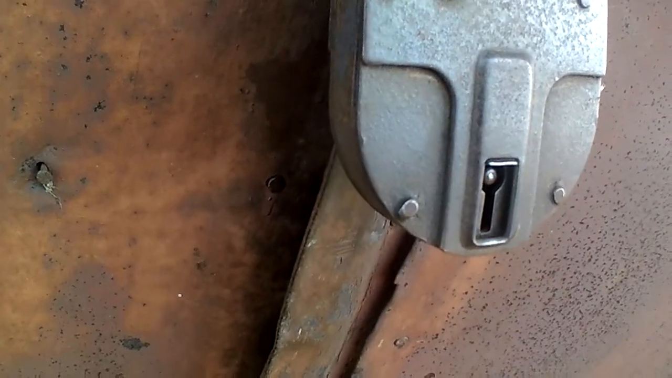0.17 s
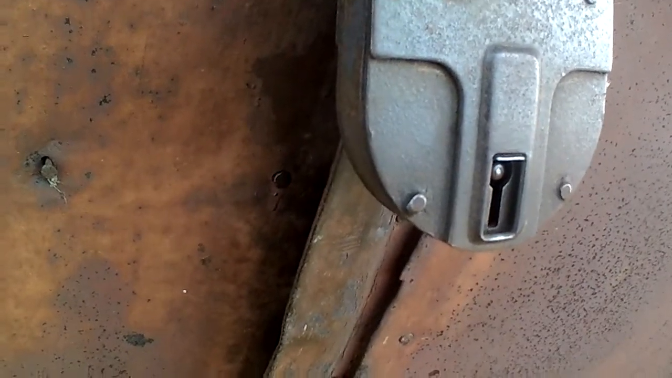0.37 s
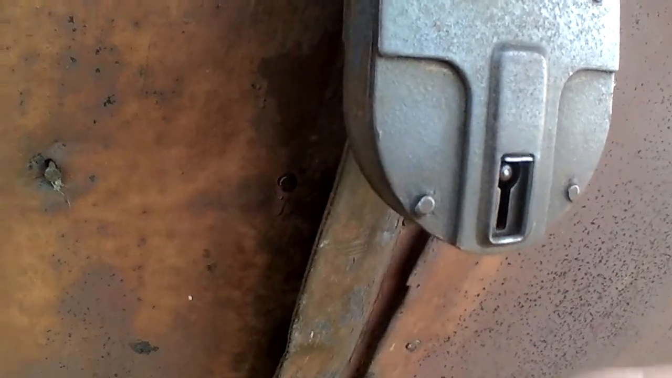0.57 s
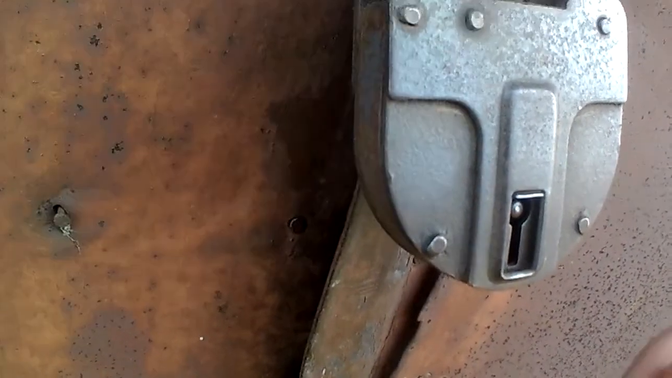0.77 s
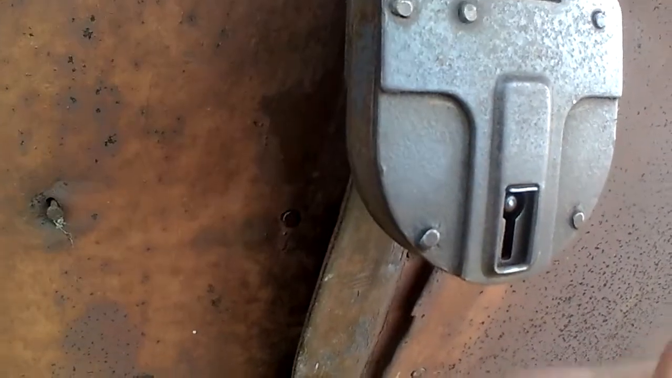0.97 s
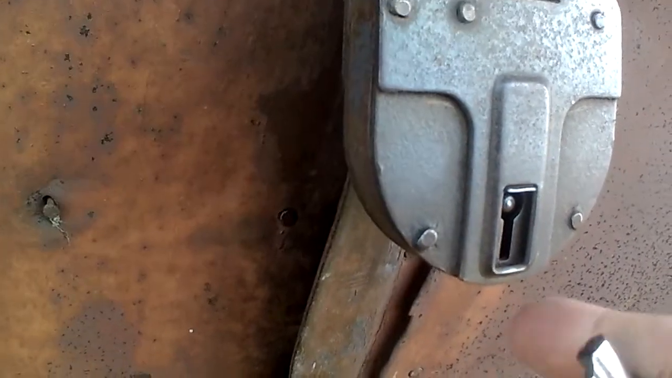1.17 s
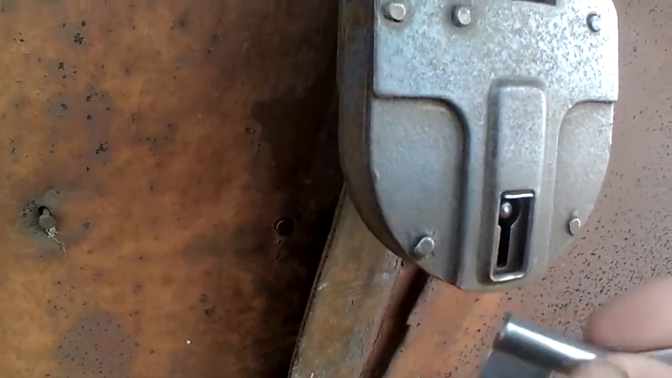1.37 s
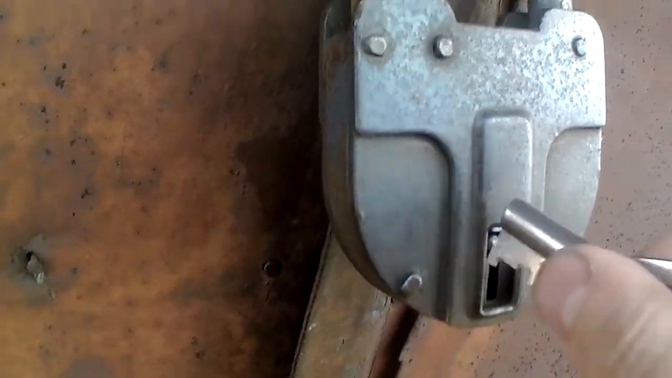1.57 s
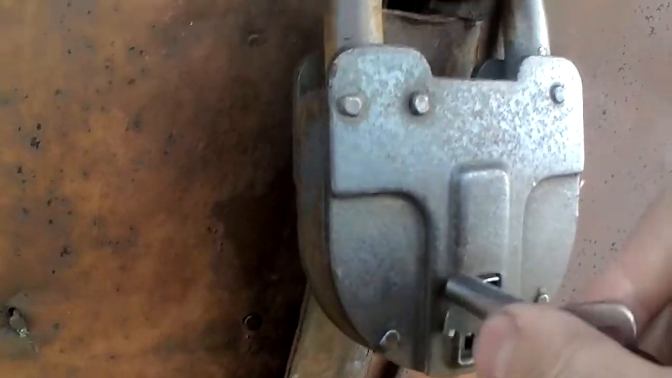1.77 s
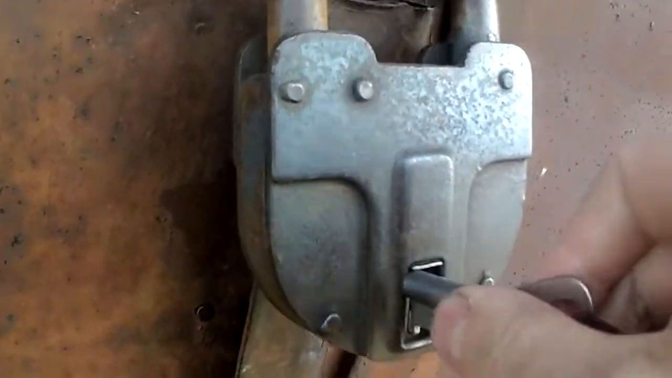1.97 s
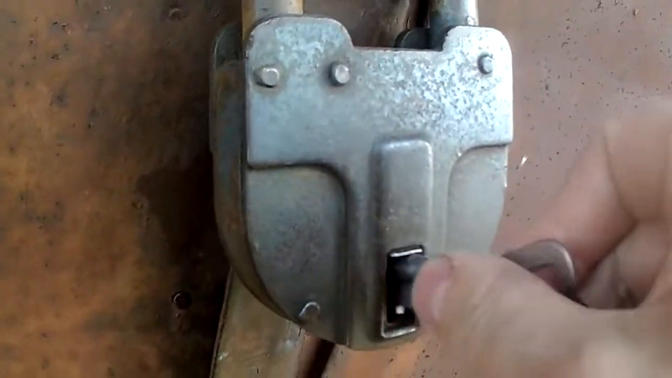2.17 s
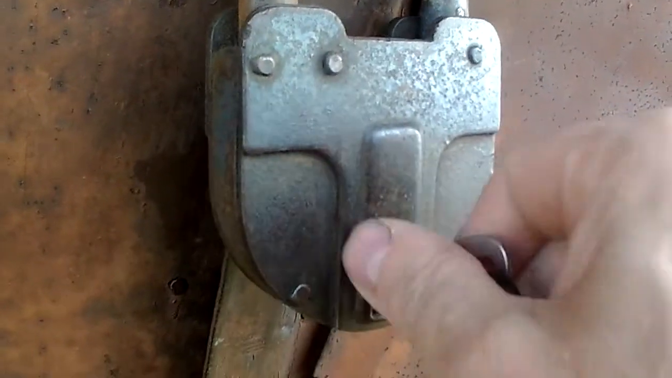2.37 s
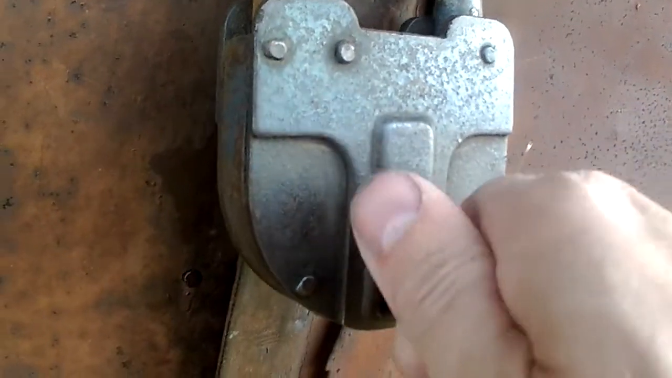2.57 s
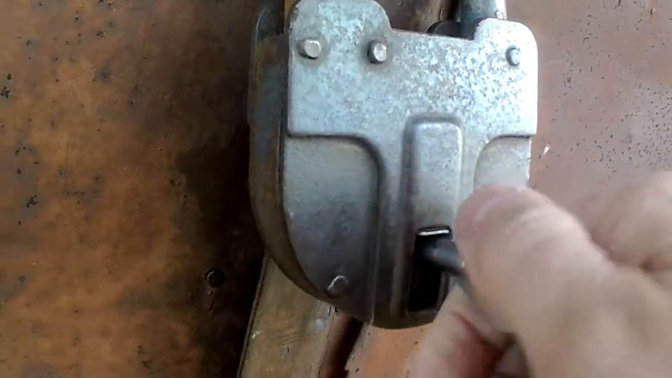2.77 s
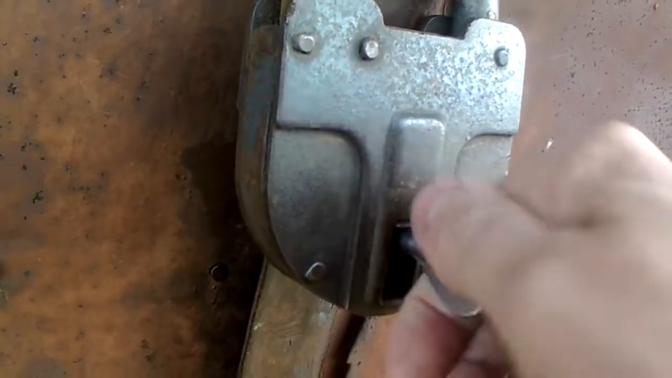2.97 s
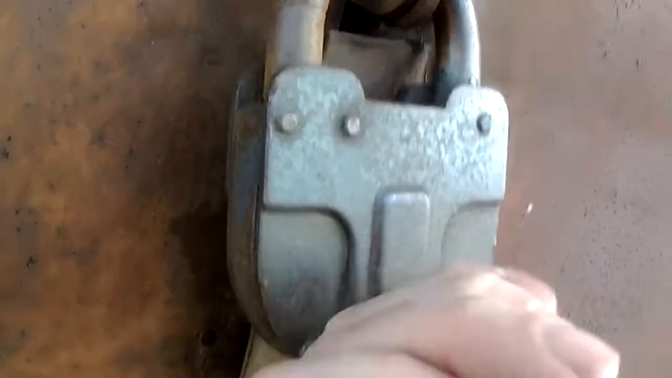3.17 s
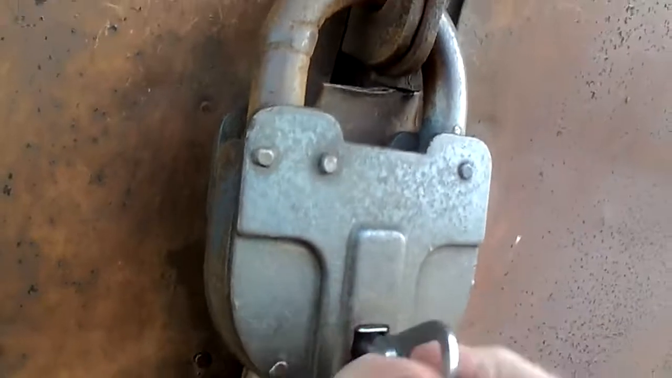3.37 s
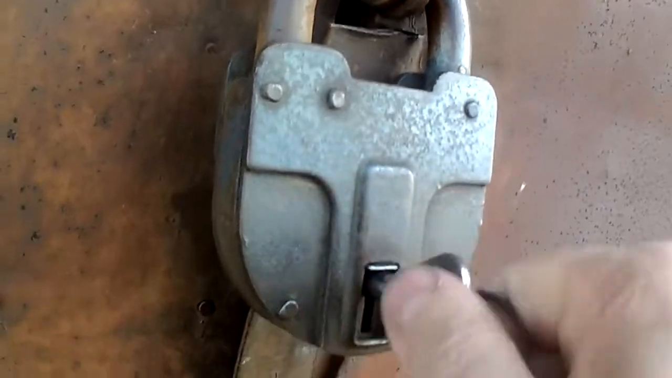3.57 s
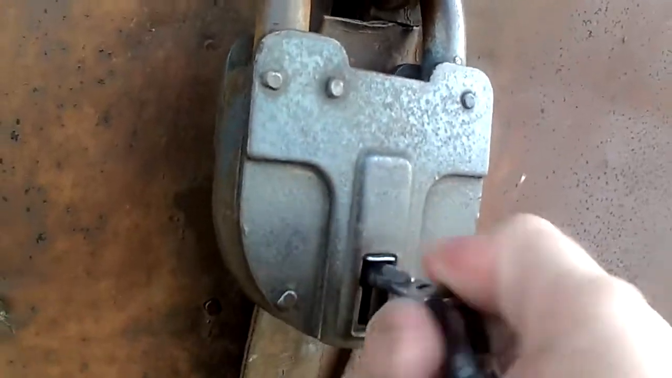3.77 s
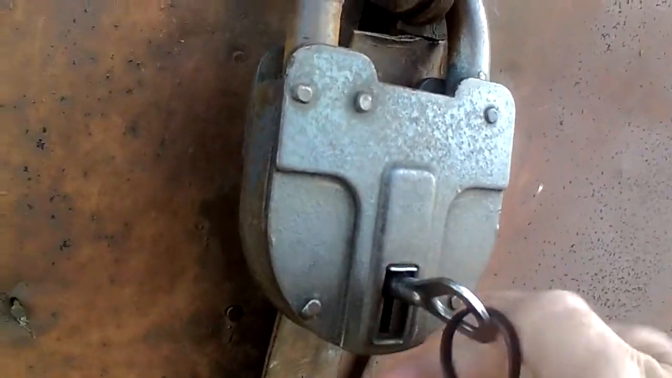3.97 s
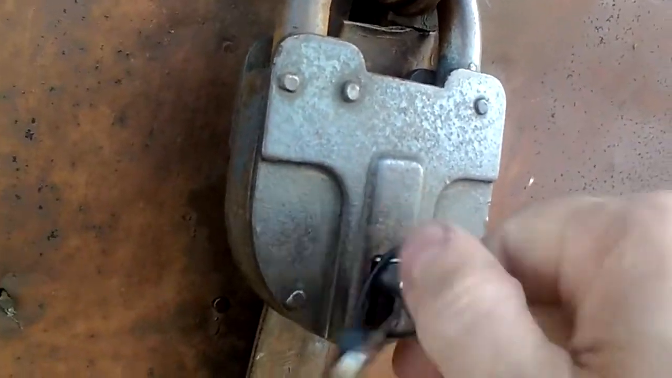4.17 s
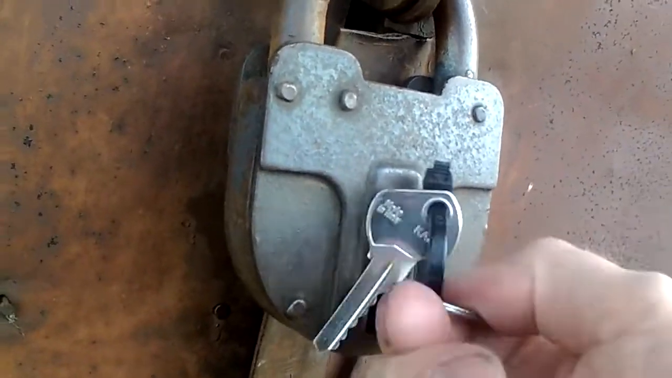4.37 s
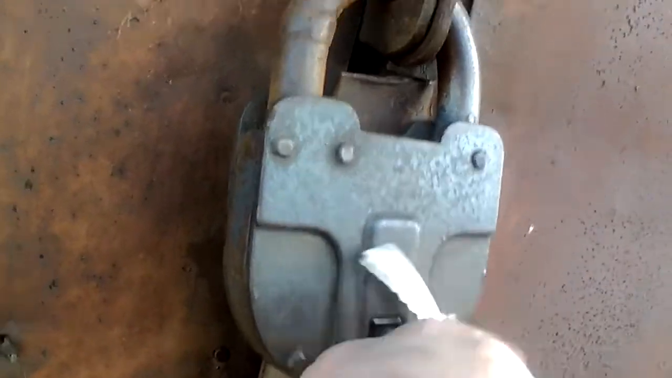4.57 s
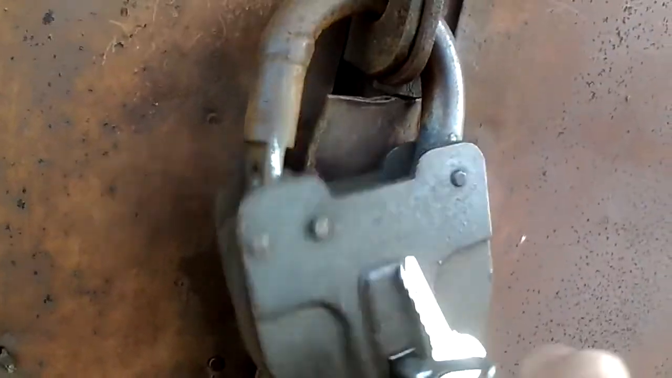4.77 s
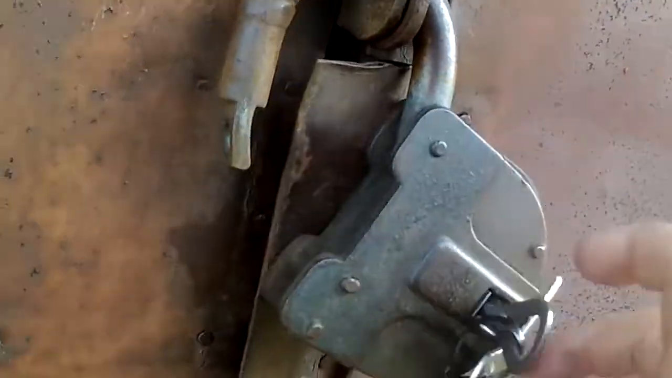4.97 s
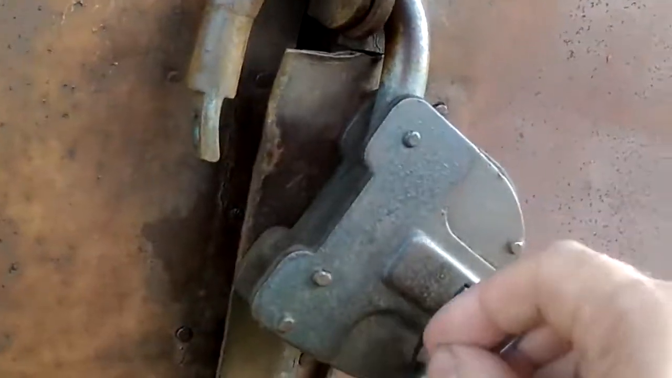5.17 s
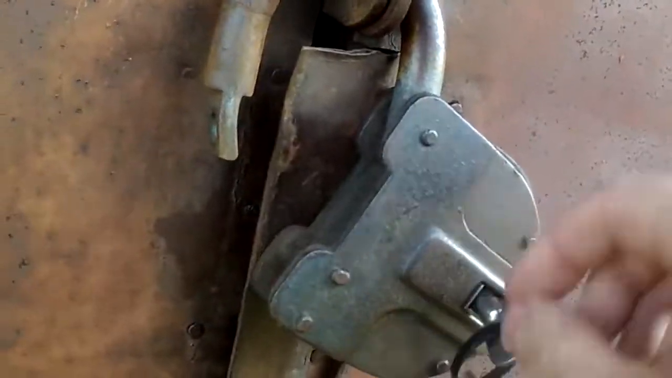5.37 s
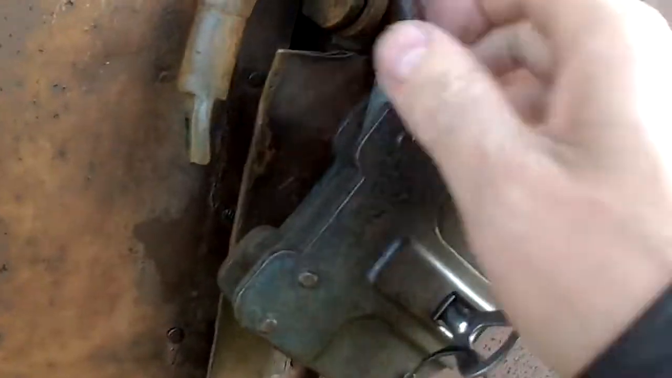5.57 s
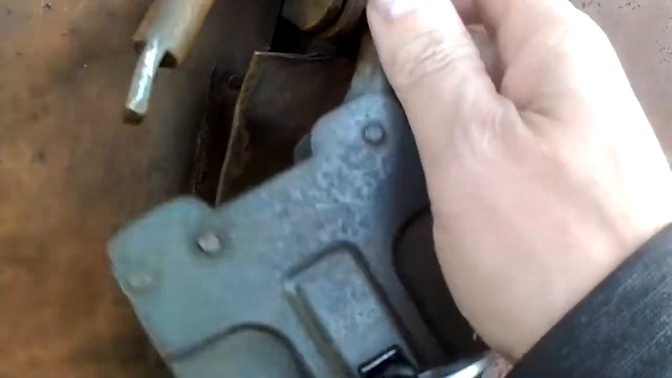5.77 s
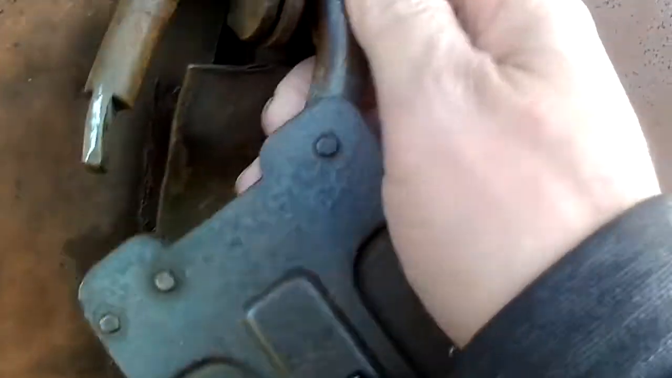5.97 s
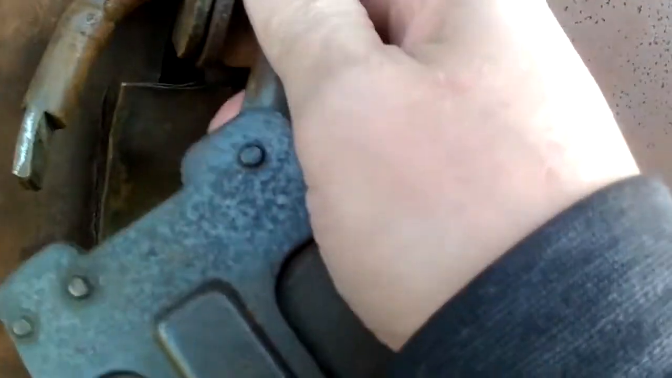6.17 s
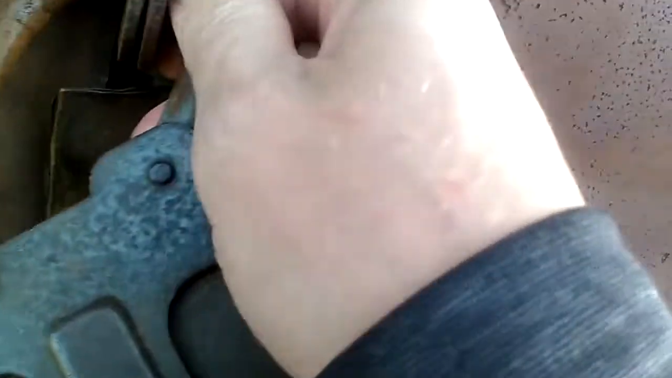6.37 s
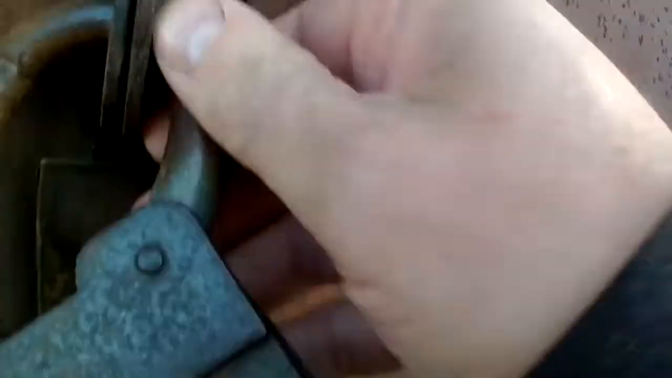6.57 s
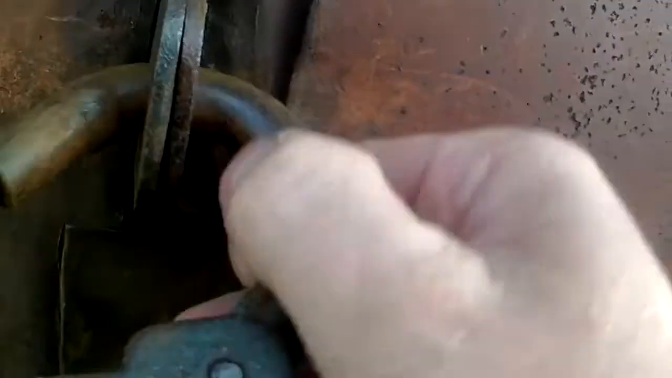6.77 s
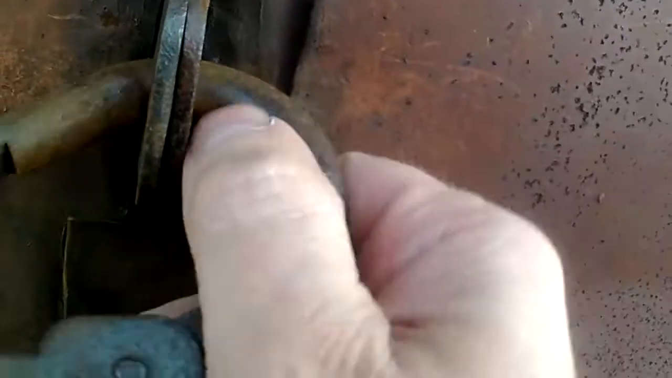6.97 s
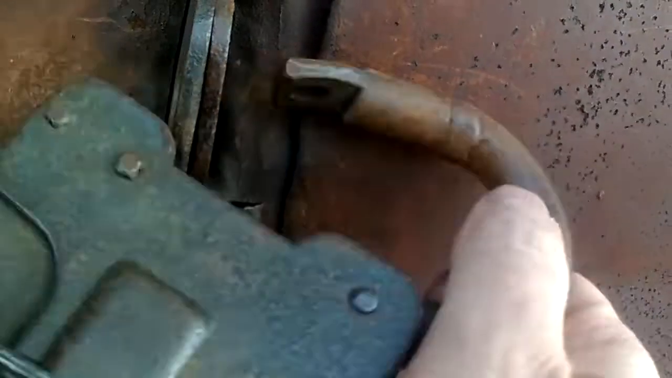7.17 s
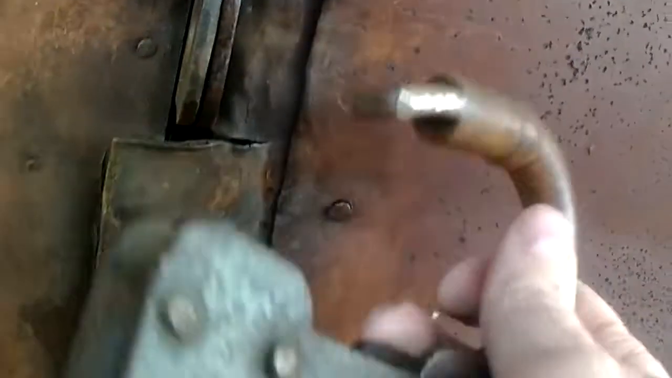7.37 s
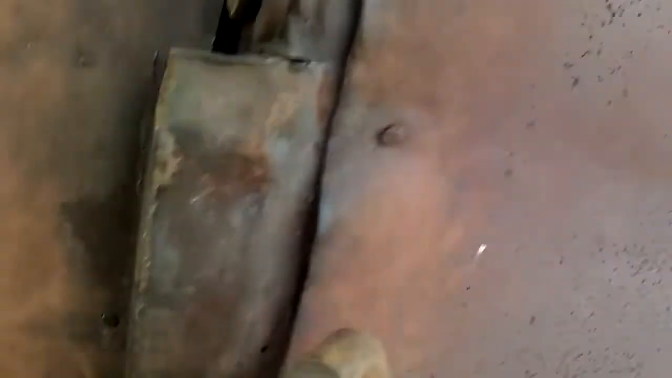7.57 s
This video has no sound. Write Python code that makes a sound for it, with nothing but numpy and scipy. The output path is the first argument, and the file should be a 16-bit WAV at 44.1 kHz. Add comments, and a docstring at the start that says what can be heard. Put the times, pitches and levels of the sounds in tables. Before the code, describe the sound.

A close microphone outdoors picks up a heavy steel padlock on a sheet-metal door, over faint steady air hiss. The first 1.3 seconds are nearly silent, with barely audible tiny key tinkles. From 1.4 to 1.7 seconds the key clicks and lightly scrapes into the keyhole; a hard bright clack lands at 1.94. Small faint taps and knocks continue until a loud clattering snap at 3.5. Loose keys rattle around 4.1, a still sharper snap comes at 4.37, then a busy scrape and jingle near 4.6. Quiet handling follows, with a dull knock at 5.5 and light ticks around 5.85. From 6.4 to 7.0 the shackle grinds and bangs through the hasp in loud, clanking bursts, the door answering with a short hollow ring. Lighter clinks follow, and a few dull knocks with a thin fading ring end it near 7.55.

```python
"""Outdoors at a sheet-metal garage door, microphone close to a heavy steel padlock being unlocked.
The key taps and turns, the bolt snaps over, spare keys jingle on their ring,
then the shackle scrapes out through the hasp. Filtered impulses and noise make the steel contacts;
decaying noise coloured by resonances makes the door's answer; fading sines make keys and free steel.
Filtered noise makes the outdoor air that hisses behind."""
import sys
import numpy as np
from scipy import signal
from scipy.fft import rfft, irfft, next_fast_len
from scipy.io import wavfile
from scipy.ndimage import map_coordinates

SR = 44100
rng = np.random.default_rng(int(sys.argv[2]) if len(sys.argv) > 2 else 0)


def generate_wav(sig):
    """Save sig (samples, or channels by samples) to the path in sys.argv[1] as 16-bit PCM at SR."""
    pcm = np.round(np.clip(np.atleast_2d(sig).T, -1, 1) * 32767).astype(np.int16)
    wavfile.write(sys.argv[1], SR, pcm)


N = 336483


def amp(db):
    """Decibels to gain."""
    return 10 ** (np.asarray(db) / 20)


def unit(x):
    """x at rms 1."""
    return x / np.sqrt(np.mean(x ** 2) + 1e-20)


def blow(x):
    """x scaled to the energy of 10 ms at rms 1."""
    return x * np.sqrt(.01 * SR / (np.sum(x ** 2) + 1e-20))


def along(points, hz):
    """(Hz, value) points read on a log frequency axis."""
    point_hz, values = np.transpose(points)
    return np.interp(np.log(hz + 1), np.log(point_hz + 1), values)


def add(track, start_s, sound):
    """Mix a sound into the track at start_s, cut off where the track ends."""
    start = max(round(start_s * SR), 0)
    part = track[start:start + len(sound)]
    part += sound[:len(part)]


def coloured(x, db_at):
    """x through a causal minimum-phase filter whose gain in dB is a function of frequency."""
    size = 2 * next_fast_len(len(x) // 2 + 2048)
    log_gain = np.log(amp(db_at(np.fft.rfftfreq(size, 1 / SR))) + 1e-7)
    # folding the cepstrum onto positive times makes the filter causal
    cepstrum = irfft(log_gain)
    cepstrum[1:size // 2] *= 2
    cepstrum[size // 2 + 1:] = 0
    response = np.exp(rfft(cepstrum))
    return irfft(rfft(x, size) * response)[:len(x)]


# key, case or shackle strikes once, cleanly:
# start_s, level_db (steel sound over 10 ms), pitch_hz (struck part), brightness_db_per_octave
TAPS = [(1.2949, -42, 1420, -11), (1.4286, -23.5, 2030, 4.5), (1.553, -31.5, 2130, 6.5),
        (1.67, -28, 2830, 5.5), (1.711, -27, 2260, 3), (1.9367, -15.5, 2740, 5), (2.2372, -43.5, 2410, 10),
        (2.503, -46.5, 2120, 13), (2.6264, -37.5, 2750, 0.5), (2.6564, -33, 2400, 1.5),
        (2.7201, -39.5, 2460, 8), (2.8314, -41, 3080, 7), (3.4776, -22, 2300, 9), (3.8777, -39.5, 2040, 9),
        (4.0934, -31.5, 2190, -5), (4.109, -31.5, 2090, 19.5), (4.4702, -41, 1760, 0),
        (4.6704, -30.5, 1300, 11), (5.167, -39, 1080, 10), (5.5506, -39.5, 1950, 10.5),
        (5.8414, -23.5, 2020, 11.5), (5.853, -32.5, 1866, 8), (5.8739, -37.5, 2030, 9),
        (5.9193, -33.5, 1920, 10), (5.9299, -37.5, 1980, 12.5), (5.9531, -27.5, 1840, 7),
        (5.9705, -39.5, 1910, 5), (6.1768, -31, 1830, 9.5), (6.486, -21, 1470, -11.5),
        (6.7555, -16, 2300, 8.5), (6.7733, -26.5, 1310, 10.5), (7.1373, -30.5, 1730, 20.5),
        (7.1847, -26, 1920, 15), (7.216, -32.5, 1340, 4), (7.355, -32, 1570, 0.5)]


def taps():
    """Single clean strikes, which move the door only a little."""
    out = np.zeros(N)
    for (start_s, level_db, pitch_hz, bright_db), tail in zip(TAPS, door_tails(len(TAPS))):
        tap = strike(tail, pitch_hz, bright_db, chatter_ms=0.54, answer_db=-13, tick_db=-47)
        add(out, start_s, amp(level_db) * tap)
    return out


# the bolt, levers and loose keys clatter:
# start_s, level_db (steel sound over 10 ms), pitch_hz, chatter_ms (nominal; strike scales it)
CLATTERS = [(1.49, -44.5, 2860, 5), (1.7034, -30.5, 1530, 3.3), (1.9199, -37.5, 2825, 1.4),
            (3.4805, -13, 1520, 2.25), (3.9939, -35, 2725, 1.7), (4.1452, -34.5, 2270, 7),
            (4.2459, -32.5, 2280, 3.4), (4.28, -35.5, 2010, 1.3), (4.3735, -11.5, 2180, 2.1),
            (4.5254, -28.5, 2000, 2.9), (4.5936, -21.5, 2070, 7.7), (4.6231, -23, 1700, 7.7),
            (4.6753, -27.5, 2120, 3.1), (4.779, -35.5, 2780, 6), (4.7935, -34.5, 1130, 4.2),
            (5.0255, -33, 2050, 5.3), (5.4924, -31.5, 1390, 3.2), (5.806, -39, 2010, 3.6),
            (6.1926, -40, 1880, 3.6), (6.9558, -15, 1750, 3.5), (7.455, -31.5, 1540, 1.05)]
TICK_PER_DB = 0.24  # a harder clatter is also sharper: dB more tick for each dB of level


def clatters():
    """Loose hard parts chatter brightly against the case."""
    out = np.zeros(N)
    for (start_s, level_db, pitch_hz, chatter_ms), tail in zip(CLATTERS, door_tails(len(CLATTERS))):
        tick_db = -38 + TICK_PER_DB * level_db
        clatter = strike(tail, pitch_hz, bright_db=10.5, chatter_ms=chatter_ms,
                         answer_db=-8.0, tick_db=tick_db)
        add(out, start_s, amp(level_db) * clatter)
    return out


# the heavy lock and shackle bump the hasp:
# start_s, level_db (steel sound over 10 ms), pitch_hz, brightness_db_per_octave
KNOCKS = [(1.9749, -36.5, 2800, 1), (2.0028, -37.5, 2800, 0), (2.2881, -40.5, 2280, -1.5),
          (2.859, -36.5, 2250, 4.5), (2.9727, -35, 1900, 3.5), (2.9833, -38, 1675, 6),
          (3.001, -38.5, 2340, 0), (3.124, -34.5, 2170, -7.5), (3.187, -33.5, 1570, -7),
          (3.486, -22.5, 1400, -6.5), (3.6592, -36, 2110, -5), (4.1189, -31, 2320, -6.5),
          (4.3067, -33.5, 1980, 1.5), (4.849, -34, 1290, 1), (4.901, -38, 1125, 4.5),
          (5.0709, -39, 2180, -1.5), (5.2105, -29.5, 1440, -1.5), (5.4783, -22, 1869, -5),
          (6.3763, -27, 1760, 1), (6.4547, -36.5, 2125, -11), (6.6788, -17.5, 1540, -7.5),
          (6.8325, -18.5, 1890, 3), (6.8652, -17.5, 1900, -6), (6.9262, -21.5, 1810, 5.5),
          (6.962, -16, 1710, -8.5), (7.0555, -26.5, 1540, -6.5), (7.2477, -33, 1570, 5),
          (7.5292, -32, 1911, -8), (7.543, -24.5, 1783, -7.5), (7.5584, -30, 1900, -7),
          (7.5723, -22, 1860, -11)]


def knocks(bounce_ms=3.45, tilt_per_doubling=13):
    """Blows on the hasp go straight into the door; dull ones land dead, bright ones chatter longer."""
    out = np.zeros(N)
    for (start_s, level_db, pitch_hz, bright_db), tail in zip(KNOCKS, door_tails(len(KNOCKS))):
        chatter_ms = bounce_ms * 2 ** (bright_db / tilt_per_doubling)
        knock = strike(tail, pitch_hz, bright_db, chatter_ms, answer_db=-5.5, tick_db=-45.5)
        add(out, start_s, amp(level_db) * knock)
    return out


TICK_PER_TILT = 0.82  # dB more tick for each dB per octave: hard contacts are both bright and ticky
# dB of door answer for each dB per octave: bright contacts come from light parts, which shake it less
DOOR_PER_TILT = -0.35


def strike(tail, pitch_hz, bright_db, chatter_ms, answer_db, tick_db, clean_ms=0.83):
    """One steel-on-steel contact: an impact, a little chatter and the door's answer."""
    # a loose part rattles instead of striking once
    force = chatter(1.11 * chatter_ms) * (chatter_ms / clean_ms) ** 2
    force[0] += 1
    force = case_ring(force, ring_db=-12, t60=0.041)
    peak_db = 7 + 6 * np.exp(-chatter_ms / 3)  # a clean strike lets the part ring more purely
    clack = coloured(force, lambda hz: steel_db(hz, pitch_hz, bright_db, peak_db, width_hz=210))
    tick = coloured(chatter(1.7 + .51 * chatter_ms), tick_spectrum_db)
    out = np.zeros(len(tail))
    add(out, 0, blow(clack) + amp(tick_db + TICK_PER_TILT * bright_db) * blow(tick))
    add(out, .001, amp(answer_db + DOOR_PER_TILT * bright_db) * tail)
    return out


def chatter(life_ms):
    """Micro-impacts that build up and die away within a few milliseconds; energy 1."""
    age = np.arange(SR // 20) / SR * 1000 / max(life_ms, .1)
    force = rng.standard_normal(len(age)) * age ** 0.55 * np.exp(-age)
    return force / np.linalg.norm(force)


def case_ring(force, ring_db, t60, rise_s=0.00043):
    """The lock's case and levers prolong a blow with a brief, dense ring."""
    t = np.arange(len(force)) / SR
    ringing = rng.standard_normal(len(t)) * amp(-60 * t / t60) * (1 - np.exp(-t / rise_s))
    ringing /= np.linalg.norm(ringing)
    return force + amp(ring_db) * signal.fftconvolve(force, ringing)[:len(t)]


# spectrum of the hand-damped lock: freq_hz, density_db (relative, per Hz)
STEEL = [(40, -52.5), (180, -39), (270, -41.5), (500, -27.5), (700, -18.5), (1000, -6.5), (1400, 2),
         (2000, 2.5), (2600, -4), (3200, -15), (4100, -23), (4700, -36.5), (6000, -57.5), (9000, -77)]


def steel_db(hz, pitch_hz, bright_db, peak_db, width_hz):
    """The hand-damped lock, with one resonance of the part that is touched."""
    octaves = np.log2(np.clip(hz, 950, 3500) / 2000)
    resonance_db = peak_db / (1 + ((hz - pitch_hz) / width_hz) ** 2)
    return along(STEEL, hz) + bright_db * octaves + resonance_db


# spectrum of the sharp contact ticks: freq_hz, density_db (relative, per Hz)
TICK = [(4300, -31.5), (5000, 1.5), (6100, -32.5), (7200, -7), (8300, -34.5), (9700, -9), (11000, -11),
        (12400, 3), (13300, -20.5), (14400, -21.5), (16000, -31.5)]


def tick_spectrum_db(hz):
    """High, narrow peaks where hard steel ticks."""
    return along(TICK, hz)


# steel slides on steel:
# start_s, length_s, level_db (before the 0.5 dB trim), pitch_hz, door_answer_db (re level_db)
SCRAPES = [(1.583, 0.056, -41.5, 2050, -17.5), (1.638, .06, -42, 2050, -13.5), (4.126, 0.11, -41, 2220, -7),
           (4.296, 0.19, -39.5, 2170, -10.5), (4.494, 0.06, -40.5, 2050, -7),
           (4.548, .17, -33.5, 2150, -16), (4.588, 0.082, -22.5, 1300, -20), (4.741, 0.18, -37, 1420, -6),
           (5.077, 0.048, -40.5, 1600, -7), (5.332, 0.25, -40, 1150, 1.5), (5.475, 0.06, -36.5, 1400, 3),
           (6.095, 0.037, -43, 1740, 2.5), (6.364, 0.071, -32, 1700, -4), (6.542, 0.088, -24.5, 1240, -3),
           (6.654, 0.023, -36.5, 1450, -6.5), (6.751, 0.13, -31.5, 1850, -2.5),
           (6.836, 0.1, -25.5, 2310, -7), (6.909, .12, -22, 1830, -5), (6.997, 0.23, -44, 1290, -8),
           (7.238, 0.18, -42, 1400, -5), (7.39, 0.18, -44.5, 1140, -6), (7.542, 0.35, -40.5, 1100, -5.5)]
# each slide presses hardest this far into its length, then eases off
SWELL_SHARE, SWELL_DB, FADE_DB = 0.24, 12.5, 17.5


def scrapes(rub_db=-6, rasp_db=-16, tick_db=-44):
    """Rust catches and slips in uneven grains, shaking the lock and the door."""
    out = np.zeros(N)
    for (start_s, length_s, level_db, pitch_hz, answer_db), tail in zip(SCRAPES, door_tails(len(SCRAPES))):
        share = np.linspace(0, 1, round(length_s * SR))
        press_db = np.interp(share, [0, SWELL_SHARE, 1], [-SWELL_DB, 0, -FADE_DB])
        pressure = amp(press_db) * signal.windows.tukey(len(share), .1)
        rate = 900 * amp(.5 * (level_db + 23))  # slips per second: harder sliding slips more often
        smooth_rub = amp(rub_db) * rng.standard_normal(len(share))
        slips = unit(grains(len(share), rate, spread_db=6) + smooth_rub)
        rub = unit(coloured(slips, lambda hz: steel_db(hz, pitch_hz, 0, peak_db=8.5, width_hz=310)))
        catches = grains(len(share), rate, spread_db=13.5)  # the sharpest slips rasp and tick
        rasp = unit(coloured(catches, lambda hz: steel_db(hz, 3640, 7.3, peak_db=12.5, width_hz=220)))
        ticks = unit(coloured(catches, tick_spectrum_db))
        slide = rub + amp(rasp_db) * rasp + amp(tick_db) * ticks
        add(out, start_s, amp(level_db - 0.5) * pressure * slide)
        answer = signal.fftconvolve(pressure * slips, tail / np.linalg.norm(tail))
        add(out, start_s, amp(level_db + answer_db) * answer)
    return out


def grains(size, rate, spread_db):
    """Sharp slips of uneven strength at random moments; rms 1."""
    strength = amp(spread_db * rng.uniform(-0.89, 1, size)) * rng.choice([-1, 1], size)
    return unit(strength * (rng.random(size) < rate / SR))


# resonances of the door leaf: freq_hz, width_hz, level_db
DOOR_MODES = [(293, 54, -18.5), (391.6, 34, -19.5), (814, 9.2, -15), (1085, 18, -3.5), (1230, 130, -3),
              (1395, 100, 6), (1550, 50, 3.5), (1967, 110, 9), (2000, 35, -8), (2240, 31, -5),
              (2520, 40, -12.5), (3600, 89, -23)]


def door_db(hz):
    """The door's resonances stand on a bed of denser, weaker ones."""
    peaks = sum(amp(2 * level_db) / (1 + ((hz - centre_hz) / width_hz) ** 2) ** 2
                for centre_hz, width_hz, level_db in DOOR_MODES)
    bed_db = steel_db(hz, 1200, -3.5, peak_db=0.5, width_hz=170) - 2.0
    return 10 * np.log10(peaks + amp(2 * bed_db))


# how long the door rings: freq_hz, t60_s
DOOR_DECAY = [(200, 0.34), (530, 0.27), (1400, 0.14), (3700, .07)]


def door_tails(count):
    """Fresh ring-outs of the door, as coloured noise; the low notes last longest."""
    noise = rng.standard_normal((count, SR // 3))
    hz, t, bands = signal.stft(noise, SR, nperseg=128)
    decay = amp(-60 * t / along(DOOR_DECAY, hz)[:, None])
    tails = signal.istft(bands * decay, SR, nperseg=128)[1]
    colour = door_db(np.fft.rfftfreq(2 ** 14, 1 / SR))
    grid = np.linspace(0, SR / 2, len(colour))
    return [blow(coloured(tail, lambda f: np.interp(f, grid, colour))) for tail in tails]


# spare keys hit each other on the ring:
# start_s, first_key_db, second_key_db (before random scatter and mode levels)
JINGLES = [(.14, -82, -65), (.231, -70, -61), (.449, -67.5, -61), (4.093, -51, -44), (4.246, -57.5, -67),
           (4.281, -73, -69), (4.527, -57.5, -50), (4.581, -40, -50), (4.648, -71, -61), (4.78, -65, -58),
           (5.027, -65, -83), (5.549, -63, -72), (5.84, -70, -55), (6.177, -64, -68), (6.381, -74, -65),
           (6.756, -62, -55), (6.81, -77, -65), (6.958, -67, -62), (7.137, -82, -55), (7.185, -75, -63)]
# modes of the spare keys: key_number, freq_hz, level_db, t60_s
KEY_MODES = [(0, 10820, 1.5, 0.11), (0, 10890, -5, 0.17), (0, 11110, -15.5, 0.13), (1, 12360, -12, 0.13),
             (1, 12520, -14.5, 0.27), (1, 12670, -9.5, .15)]
REBOUND_S, REBOUND_DB = .04, -8  # keys swing apart and touch once more, after 0.5 to 1.5 times REBOUND_S


def keys(scatter_db=1):
    """Two small keys ring very high, at new strengths with each touch and its rebound."""
    out = np.zeros(N)
    modes = [(round(key), amp(level_db) * ring(hz, t60)) for key, hz, level_db, t60 in KEY_MODES]
    for start_s, *key_db in JINGLES:
        rebound_s = REBOUND_S * (.5 + rng.random())
        for delay_s, loss_db in [(0, 0), (rebound_s, REBOUND_DB)]:
            for key, note in modes:
                level_db = key_db[key] + loss_db + scatter_db * rng.normal()
                add(out, start_s + delay_s, amp(level_db) * note)
    return out


def ring(hz, t60):
    """One fading sine mode, struck from rest, with a peak of root 2 before its decay."""
    t = np.arange(SR // 2) / SR
    attack = 1 - np.exp(-(t / .0008) ** 2)
    return np.sqrt(2) * np.sin(2 * np.pi * hz * t) * amp(-60 * t / t60) * attack


# steel parts left free to ring: start_s, freq_hz, level_db, t60_s
RINGS = [(.23, 3860, -51, 0.23), (1.4295, 2070, -13.5, 0.012), (1.6685, 2770, -24, 0.018),
         (1.9376, 2870, -8.5, 0.0093), (6.758, 3950, -46.5, 0.13), (6.957, 8240, -81, .35),
         (7.575, 2250, -37.5, 0.93), (7.575, 1095, -28.5, 0.12)]


def free_steel():
    """The key shank, levers and shackle keep their note for a moment when struck free."""
    out = np.zeros(N)
    for start_s, hz, level_db, t60 in RINGS:
        add(out, start_s, amp(level_db) * ring(hz, t60))
    return out


# the fingers fiddle with key and lock: start_s, end_s
FIDDLING = [(1.45, 1.8), (2.75, 2.95), (3.9, 5.2), (5.6, 5.8), (6.1, 6.25), (7.1, 7.5)]
TOUCHES_PER_S, TOUCH_DB, TOUCH_RANGE_DB = 10, -41, 6  # TOUCH_DB is the loudest; the range lies below it


def touches(pitch_hz=2050, spread_octaves=0.37):
    """Faint touches at uneven moments while the fingers work."""
    out = np.zeros(N)
    for start_s, end_s in FIDDLING:
        slots = np.arange(start_s, end_s, 1 / TOUCHES_PER_S)
        for slot_s, tail in zip(slots, door_tails(len(slots))):
            late, softness, size = rng.random(), rng.random(), rng.normal()
            touch_hz = pitch_hz * 2 ** (spread_octaves * size)
            touch = strike(tail, touch_hz, bright_db=3.5, chatter_ms=2.0, answer_db=-4, tick_db=-34.5)
            level_db = TOUCH_DB - TOUCH_RANGE_DB * softness
            add(out, slot_s + late / TOUCHES_PER_S, amp(level_db) * touch)
    return out


# brief low thumps heard under three loud clicks: start_s, level_db (over 10 ms)
LOW_THUMPS = [(1.937, -56), (4.373, -51.5), (6.76, -47.5)]


def low_thumps(corner_hz=130):
    """A faint low thump under three loud clicks: one quick rise and exponential fall."""
    out = np.zeros(N)
    t = np.arange(SR // 10) / SR
    thump = blow(np.exp(-2 * np.pi * corner_hz * t) * (1 - np.exp(-t / 0.00032)))
    for start_s, level_db in LOW_THUMPS:
        add(out, start_s, amp(level_db) * thump)
    return out


# spectrum of the outdoor air: freq_hz, density_db (relative, per Hz)
AIR = [(30, -19), (150, -23), (300, -23.5), (700, -17.5), (1000, -8.5), (1400, -2.5), (2000, -1),
       (3000, -7.5), (4000, -16.5), (5400, -37.5), (6400, -55), (8500, -50), (10000, -35), (14000, -40.5),
       (15700, -51.5)]


def air(level_db=-53):
    """Steady outdoor hiss, filtered noise that wavers a little."""
    hiss = unit(coloured(rng.standard_normal(N), lambda hz: along(AIR, hz)))
    return hiss * amp(level_db + .35 * wobble(0.76, N))


def wobble(rate, size):
    """A smooth random curve with rate knots a second."""
    knots = rng.standard_normal(int(size * rate / SR) + 4)
    return map_coordinates(knots, [np.arange(size) * rate / SR])


def scene():
    """Lock, keys and door in the open air."""
    lock = taps() + clatters() + knocks() + scrapes()
    small_steel = keys() + free_steel()
    return (lock + small_steel + low_thumps() + air() + touches())[None]


TOP_HZ = 15760  # band limit of the recorder


def record(dry):
    """The recorder keeps nothing above its band limit."""
    size = next_fast_len(N + SR // 4)
    kept = np.fft.rfftfreq(size, 1 / SR) < TOP_HZ
    return irfft(rfft(dry, size) * kept, size)[:, :N]


dry = scene()
out = record(dry)
generate_wav(out)
```